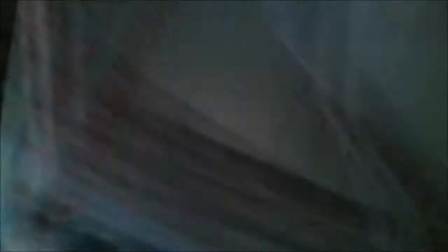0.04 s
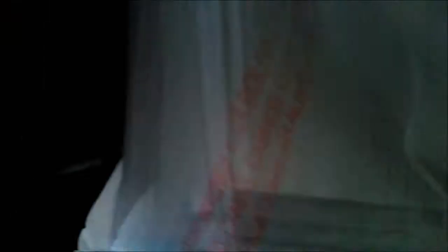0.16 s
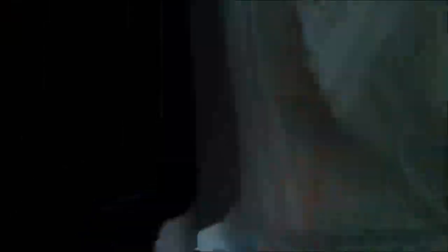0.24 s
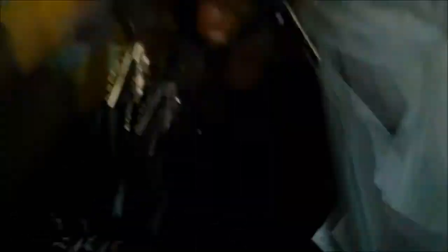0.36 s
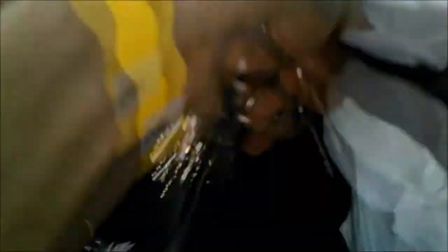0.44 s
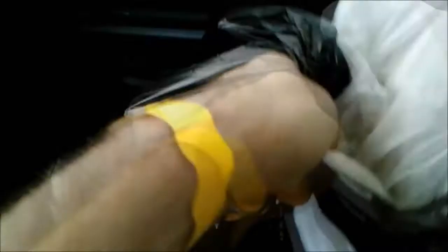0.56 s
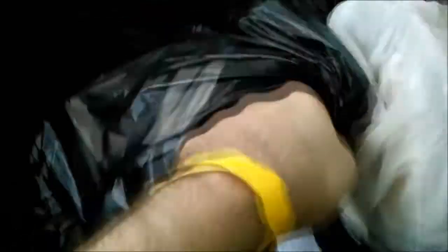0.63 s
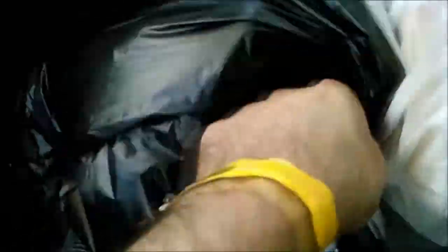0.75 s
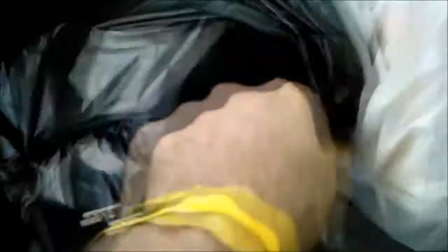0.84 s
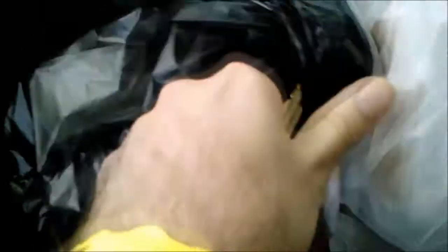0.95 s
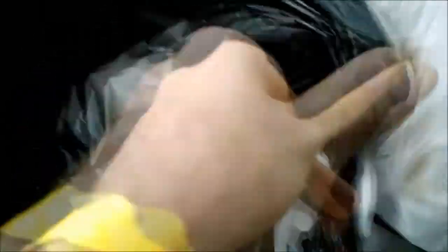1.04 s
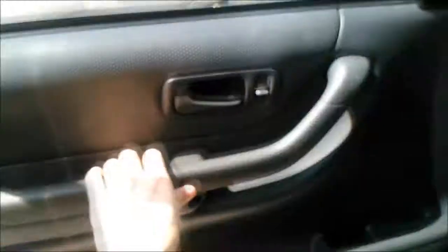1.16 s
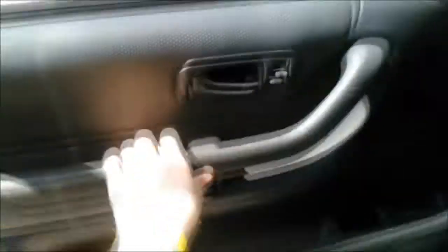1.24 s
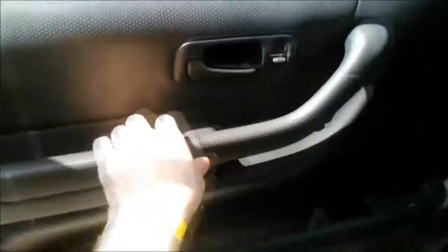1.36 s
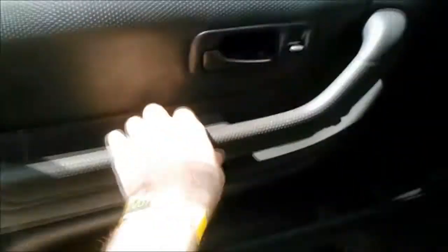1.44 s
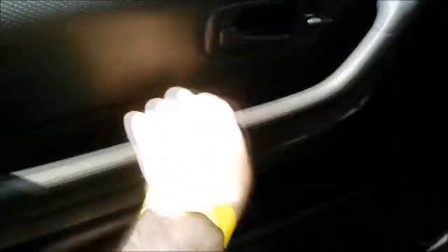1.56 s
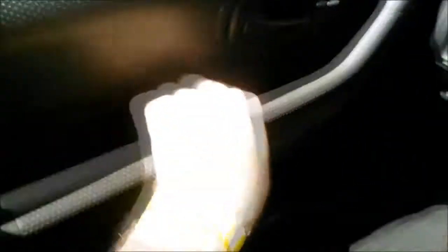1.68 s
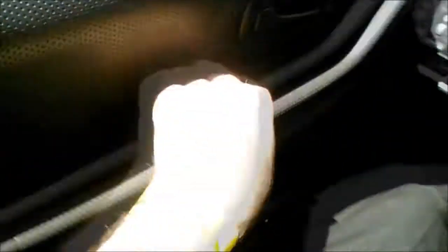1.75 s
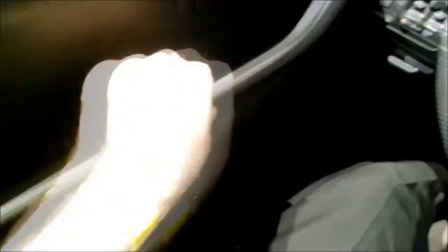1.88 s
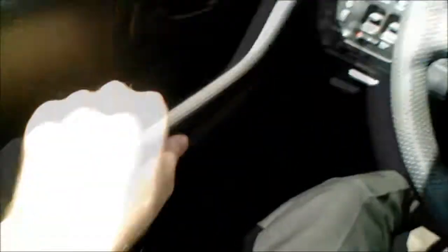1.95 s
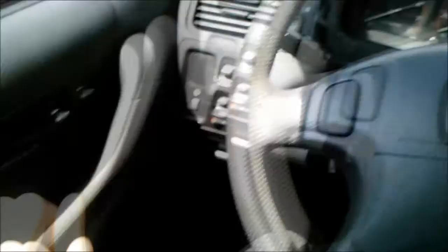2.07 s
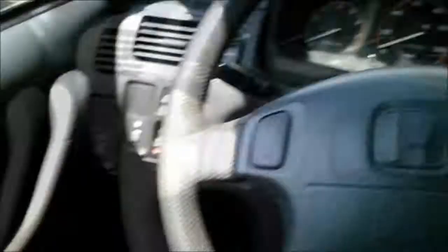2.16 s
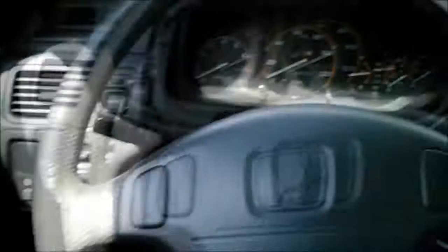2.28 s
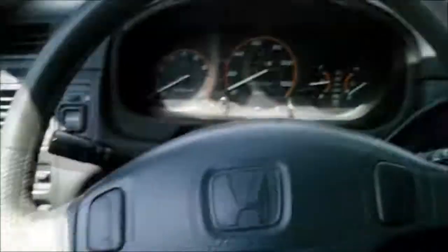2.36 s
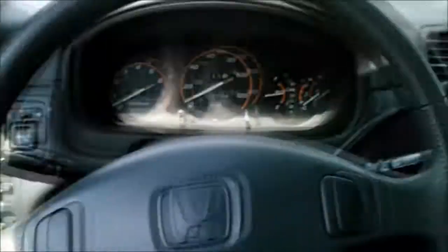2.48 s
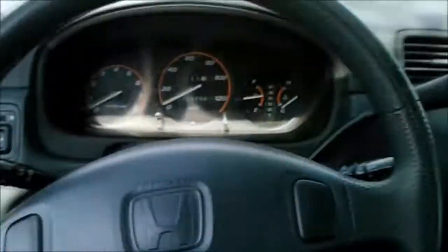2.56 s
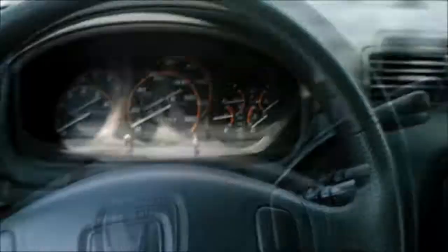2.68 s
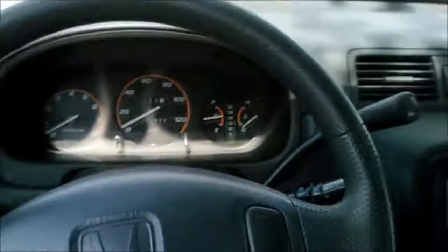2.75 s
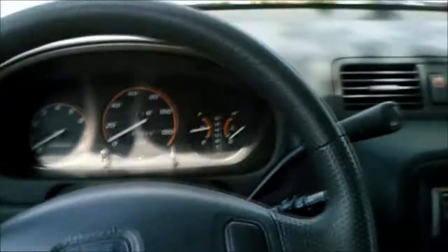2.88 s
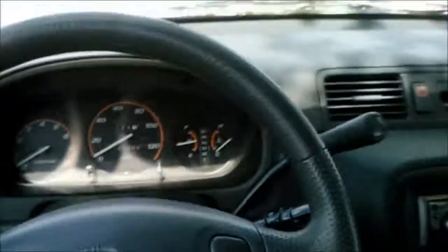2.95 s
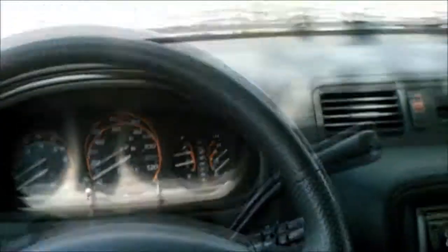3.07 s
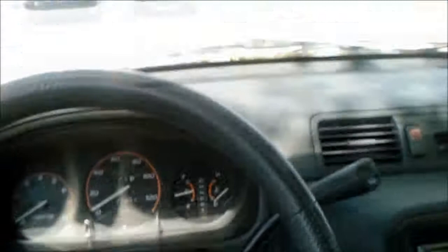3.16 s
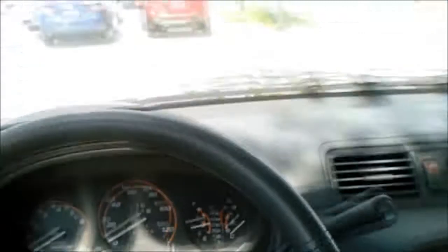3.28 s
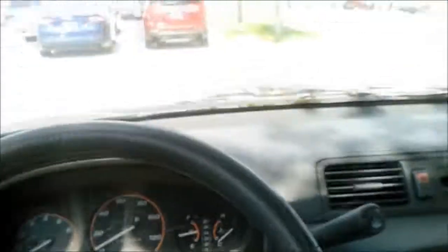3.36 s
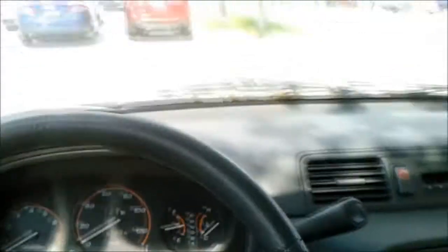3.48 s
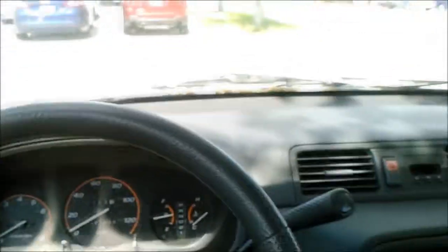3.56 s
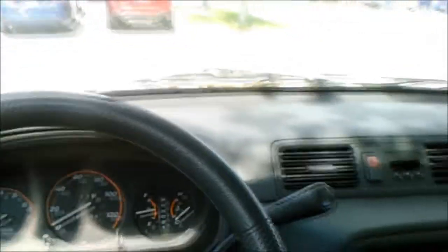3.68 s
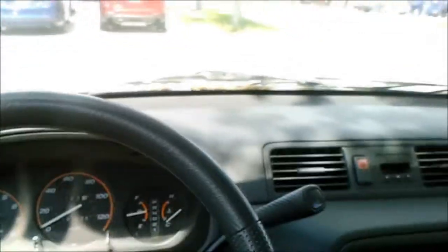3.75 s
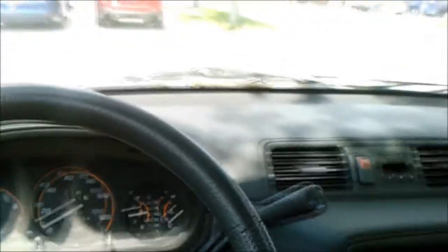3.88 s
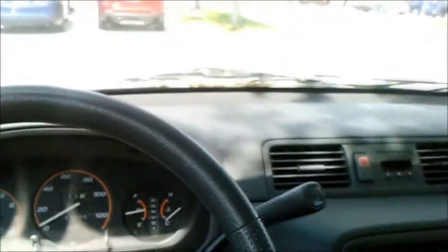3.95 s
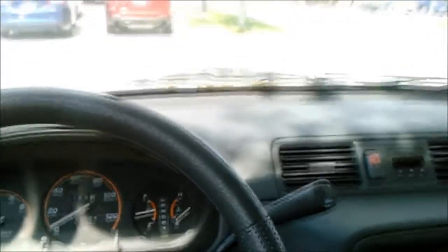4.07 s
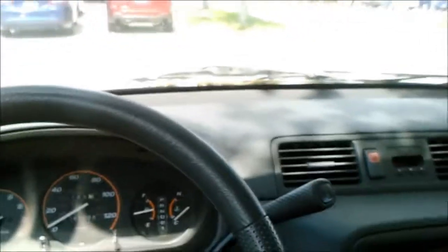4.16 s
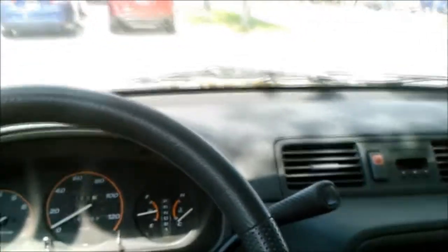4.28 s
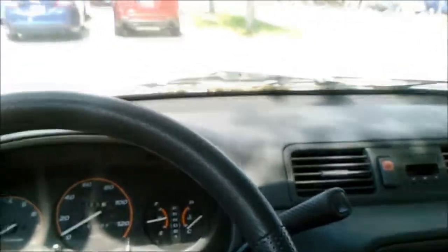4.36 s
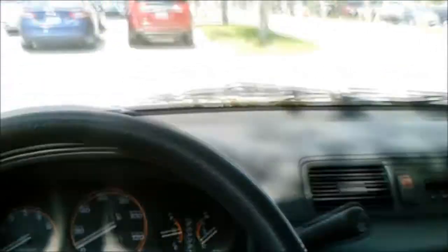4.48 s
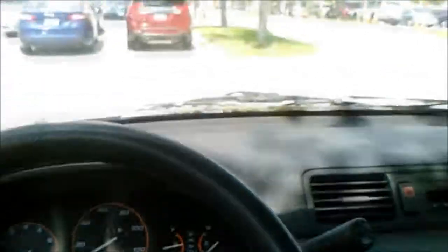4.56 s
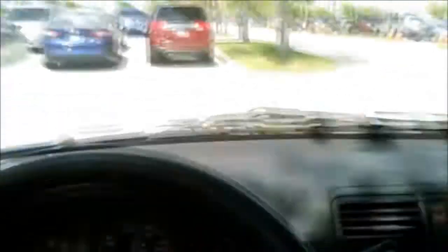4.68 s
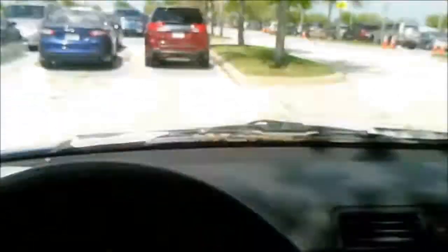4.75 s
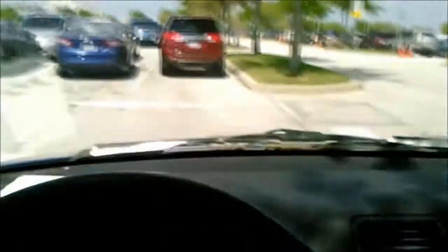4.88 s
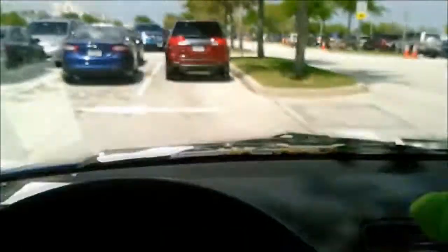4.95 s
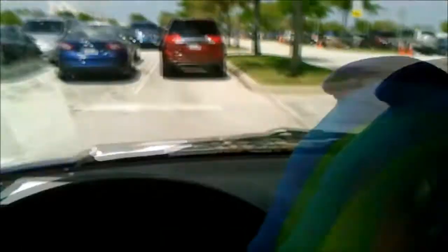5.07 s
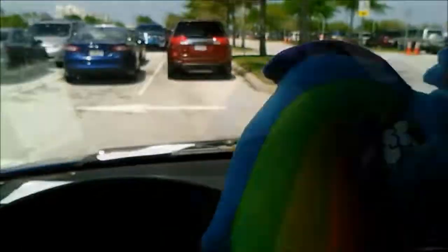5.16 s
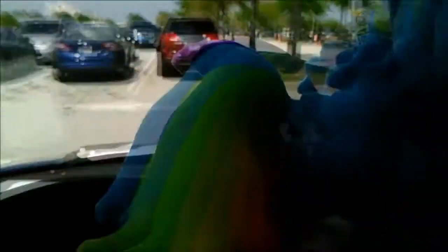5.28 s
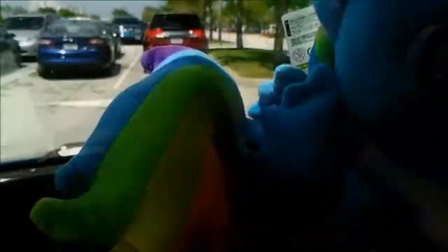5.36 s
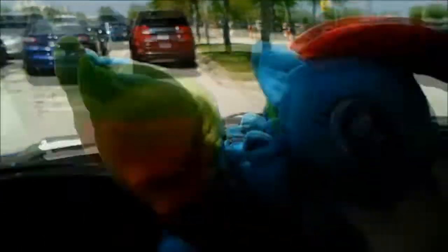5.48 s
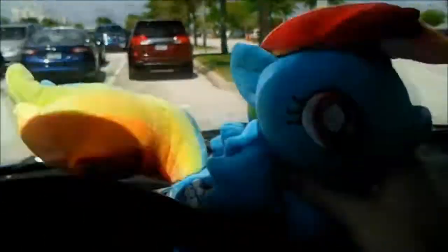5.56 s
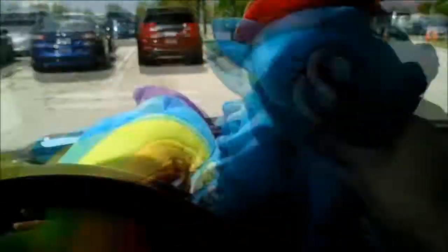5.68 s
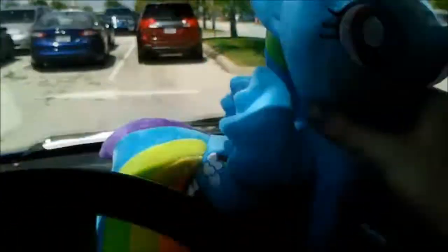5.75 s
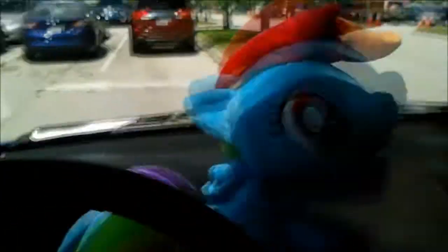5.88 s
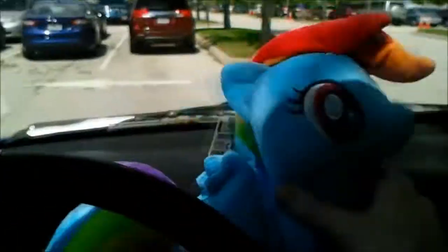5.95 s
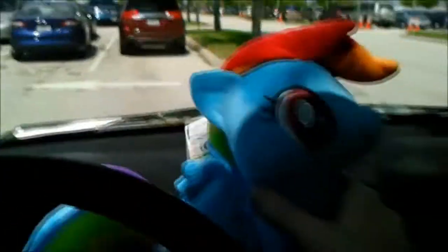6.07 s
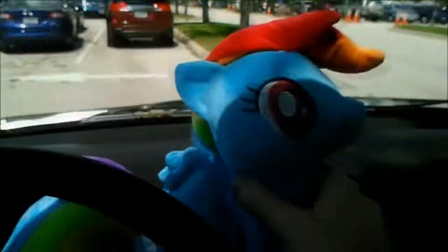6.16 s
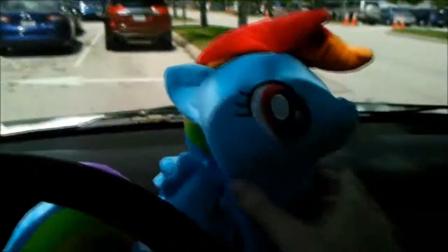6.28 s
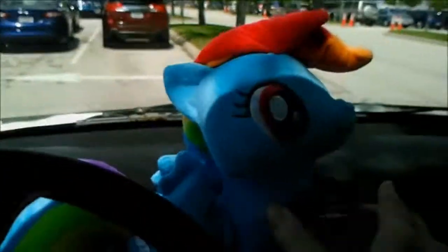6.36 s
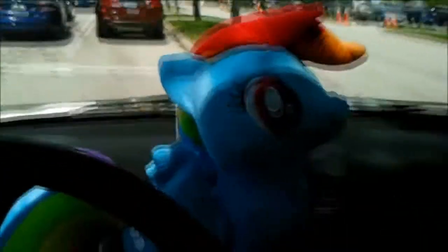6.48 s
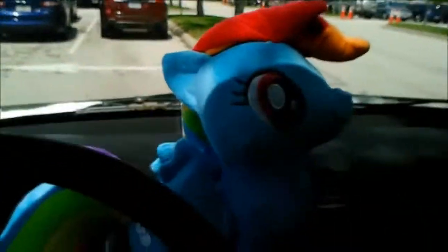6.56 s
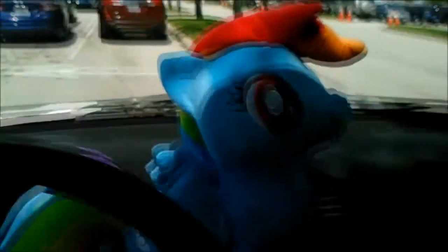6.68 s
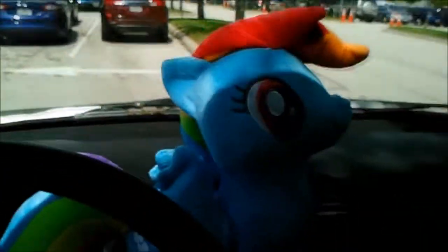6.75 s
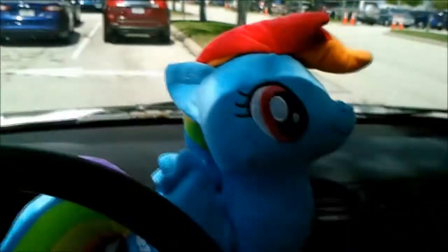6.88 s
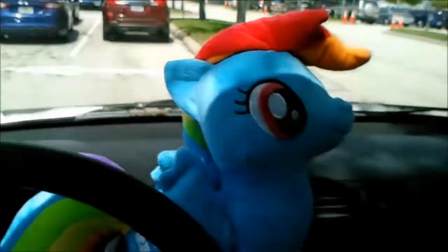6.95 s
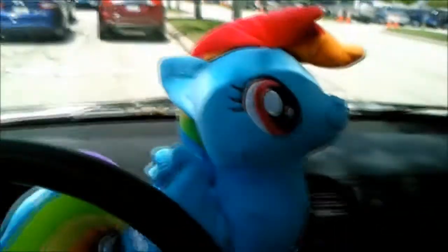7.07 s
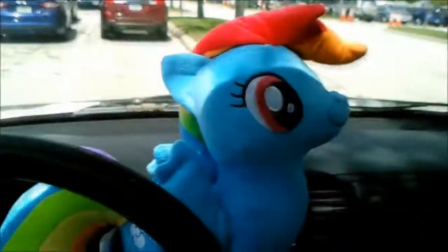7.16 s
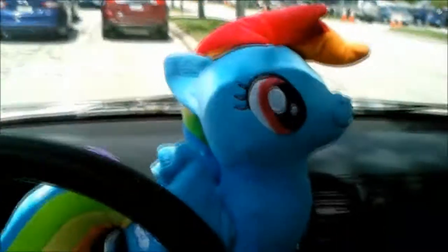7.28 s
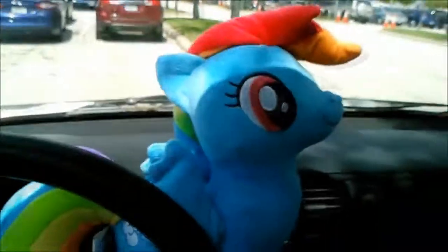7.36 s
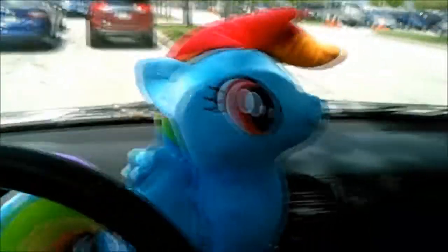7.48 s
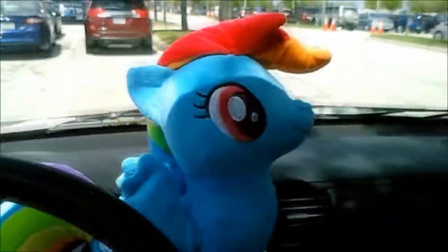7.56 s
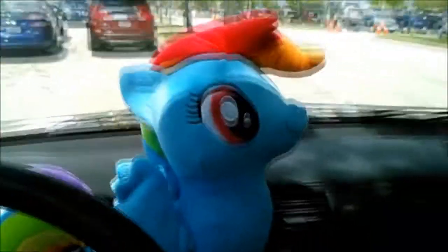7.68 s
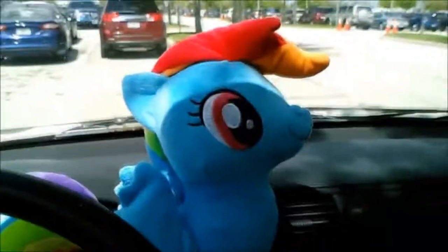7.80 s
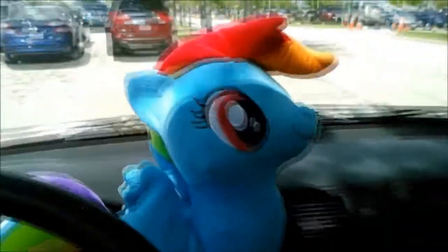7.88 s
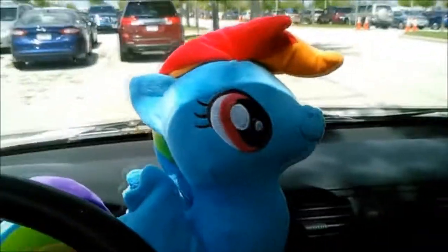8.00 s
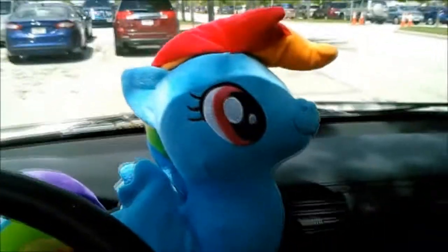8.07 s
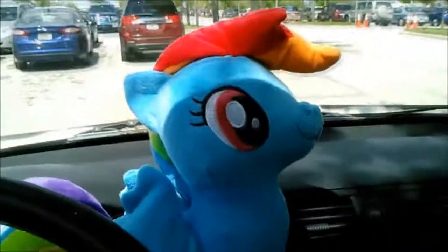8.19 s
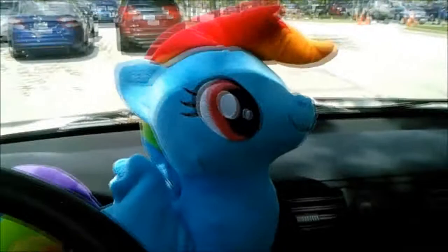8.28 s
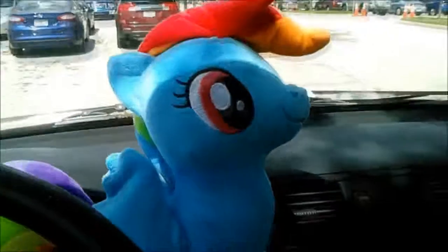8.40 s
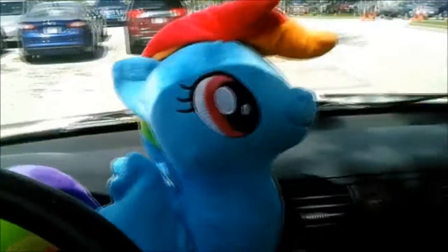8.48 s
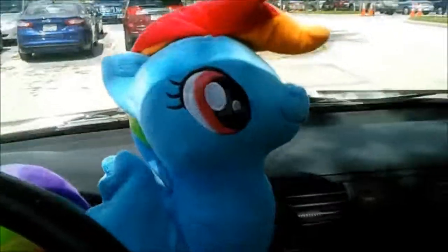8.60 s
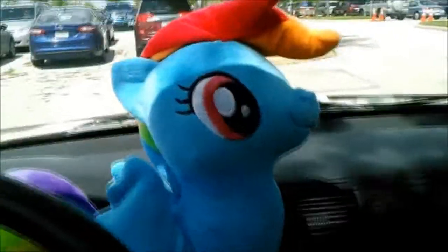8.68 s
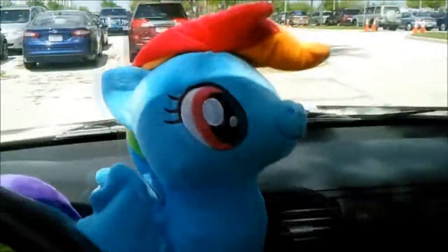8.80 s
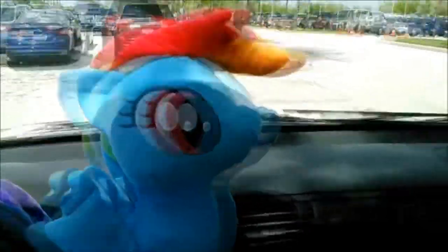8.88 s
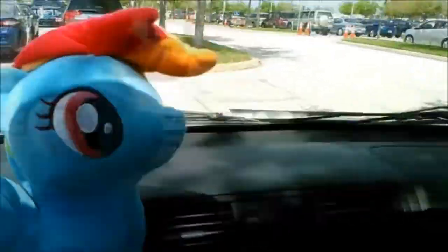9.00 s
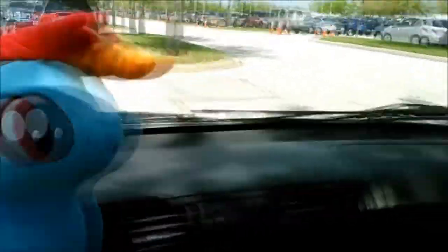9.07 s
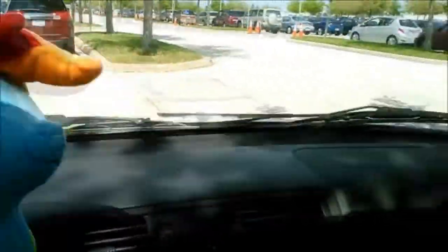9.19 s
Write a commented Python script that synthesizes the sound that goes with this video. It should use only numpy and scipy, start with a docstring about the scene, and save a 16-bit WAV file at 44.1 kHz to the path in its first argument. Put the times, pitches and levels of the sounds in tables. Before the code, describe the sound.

Close, rough mono sound: grainy plastic rustling and crumpling, a brief dull outdoor wash, then a car door latches and thuds shut, overloading the microphone. Loose trim rattles and a small reel ticks rapidly down. Afterwards the enclosed cabin is hushed, with clicks, brushing cloth, a plush toy set down with muffled knocks, and keys clinking softly.

```python
"""Inside a parked car, hand-held camera microphone, mono: low rumble and faint hum; bags and clothing rub right on it.
The door is pulled shut and overloads the microphone; a small ratchet, probably the seat-belt reel, runs down.
Then sleeves brush, trim clicks, a plush toy is set on the dashboard with soft knocks and keys jingle.
Rubs are grainy noise under stroke envelopes; door, ratchet, clicks, knocks and keys are short forces through
resonances; the background is coloured noise and wandering sines."""
import sys
import numpy as np
from scipy.fft import rfft, irfft, next_fast_len
from scipy.io import wavfile
from scipy.ndimage import map_coordinates

SR = 44100
rng = np.random.default_rng(int(sys.argv[2]) if len(sys.argv) > 2 else 0)


def store_pcm(level_fs):
    """Save levels as 16-bit WAV."""
    pcm = np.round(np.clip(level_fs, -1, 1) * 32767).astype(np.int16)
    wavfile.write(sys.argv[1], SR, np.atleast_2d(pcm).T)


N = 407043

# All table levels are relative. Spectra are densities (dB per Hz).
# Car-park rumble: f/Hz, level/dB
RUMBLE_SPECTRUM = [(18, -12.5), (35, 0.5), (54, 1), (80, -10), (130, -15.5), (160, -19.5), (270, -23),
                   (330, -29.5), (600, -28.5), (1200, -49)]
# Microphone hiss: f/Hz, level/dB
MIC_HISS_SPECTRUM = [(400, -18.5), (800, -2.5), (3000, -4.5), (6600, -2), (8500, -7.5), (15500, -5)]
# Dull wash, from outside and in swells: f/Hz, level/dB
WASH_SPECTRUM = [(50, -27), (102, 0), (135, -13.5), (220, -15), (490, -21.5), (710, -19.5), (1000, -23),
                 (1570, -23.5), (2700, -31), (6400, -32), (9000, -46.5)]
# Swells of dull wash: the opening, seat rustle and a last low scuff: t/s, hold/s, level/dB
WASH_SWELLS = [(0, .8, -45), (2.05, .1, -40), (4.4, .3, -56.5), (5.6, .6, -57), (8.6, .55, -56),
               (9.19, 0.032, -53.5)]
# Drags of the plastic over the camera: t/s, hold/s, level/dB
BAG_DRAGS = [(0, .21, -28.5), (.27, .07, -24.5), (.345, 0.13, -20.5), (.49, .05, -23), (.558, .04, -14),
             (.603, .035, -8.5), (.655, .03, -11), (.722, .025, -10), (.775, .035, -11.5), (.83, .075, -17),
             (1.02, .12, -20.5)]
# Hiss of sliding plastic: f/Hz, level/dB
BAG_HISS_SPECTRUM = [(1500, -27.5), (2900, -10.5), (3800, -2), (5000, -0.5), (6600, -0.5), (9300, -18),
                     (15500, -19.5)]
# Crunch of pressed plastic: f/Hz, level/dB
BAG_CRUNCH_SPECTRUM = [(600, -37.5), (1050, -5.5), (1500, 0.5), (2300, 0.5), (2900, -5), (4500, -26),
                       (8000, -57.5)]
# Camera body shaken by the crunch: f/Hz, level/dB
CAMERA_BODY_SPECTRUM = [(40, -24), (150, -11.5), (350, -0.5), (600, -8), (900, -2), (1400, -22),
                        (3000, -62.5)]
# The bag crumples under the hand: t/s, level/dB
BAG_CRUMPLES = [(.642, -9), (.729, -7.5), (.797, -16)]
# Dull bumps of hand and bags on the case: t/s, level/dB
CASE_BUMPS = [(0.005, -34.5), (0.383, -29.5), (0.635, -33), (0.739, -30.5), (1.123, -32.5)]
# Bumps heard through the case: f/Hz, level/dB
BUMP_SPECTRUM = [(15, -10.5), (50, 0.0), (200, -3.5), (700, -34.5)]
# Plastic clicks: t/s, level/dB, t60/s, centre f/Hz
PLASTIC_CLICKS = [(0.2276, -6, 0.049, 2760), (0.2534, -7.5, 0.017, 3140), (1.0656, -0.5, 0.0015, 5967),
                  (3.3562, -26.5, 0.01, 1780), (3.424, -39.5, .008, 1500), (3.4869, -26, 0.003, 6060),
                  (3.4995, -29.5, 0.0031, 7000), (3.539, -15, 0.0028, 5000), (3.7288, -23.5, 0.053, 1890),
                  (3.976, -47, 0.037, 1000), (4.229, -49, .02, 1510), (4.309, -45, 0.019, 1506),
                  (4.378, -31.5, 0.023, 6040), (4.602, -36.5, 0.011, 5930), (5.615, -44, 0.14, 1500),
                  (6.061, -39, 0.066, 1490), (6.082, -33.5, 0.108, 2000), (9.119, -29, .025, 5946)]
# Tone balance of the clicks: f/Hz, gain/dB
CLICK_TONE = [(100, 5.5), (300, 6.5), (800, 3), (6500, -1.5), (10000, -10.0), (16000, -11)]
# Sleeve brushing seat and camera: t/s, hold/s, level/dB
SLEEVE_BRUSHES = [(2.37, 0.18, -53), (3.13, 0.025, -51), (4.33, 0.054, -53.5), (4.425, 0.028, -48.5),
                  (4.595, .06, -49), (4.675, 0.05, -40.5), (4.785, 0.012, -43), (8.265, 0.1, -42),
                  (8.515, .02, -46), (8.635, 0.01, -48), (8.75, .19, -50.5), (8.98, 0.076, -37.5),
                  (9.09, 0.071, -46)]
# Quick scuffs: sharp onsets of bag and sleeve rubs, and short slides: t/s, level/dB
QUICK_SCUFFS = [(.559, -11), (3.538, -26), (3.552, -29), (4.788, -41), (8.349, -26)]
# Brushes and scuffs: f/Hz, level/dB
CLOTH_SPECTRUM = [(120, -29), (350, -9.5), (800, -13), (1400, -10.5), (2400, -10.5), (3200, -7), (4600, -5),
                  (6300, 0.5), (8500, -7), (15500, -19)]
# Rattle of the door trim: f/Hz, level/dB
TRIM_SPECTRUM = [(120, -24), (300, -4.5), (700, -5), (1000, -14), (1500, -9.5), (2300, -3.5), (3100, -9),
                 (4200, -4.5), (6300, -7.5), (8000, -21), (15500, -35)]
# Door panel resonances: f/Hz, width/Hz, level/dB
PANEL_MODES = [(350, 73, -7), (464, 85, -10.5), (863, 78, -4), (1286, 110, 5.5), (2060, 210, -5.5),
               (2820, 150, -5), (4080, 160, -7)]
# Door latch resonances: f/Hz, width/Hz, level/dB
LATCH_MODES = [(580, 47, 1), (698, 60, 0), (830, 87, -3.5), (346, 70, -6)]
# Modes of the cabin air and body: f/Hz, level/dB
CABIN_MODES = [(27, -5), (42, -9), (64, -2), (91, -3.5), (104, -7.5), (121, -4), (143, -6), (171, -4.5),
               (200, -10), (245, -12.5)]
# Last single rattles of the trim: t/s, level/dB
LAST_RATTLES = [(2.141, -8.5), (2.172, -14), (2.184, -12), (2.214, -24.5), (2.2635, -20), (2.326, -27),
                (2.398, -43)]
# Ratchet pawl resonances: f/Hz, width/Hz, level/dB
PAWL_MODES = [(442, 91, -3.5), (635, 80, -1), (1022, 50, 0), (1376, 130, -7), (1860, 200, -9.5),
              (3570, 560, -16.5)]
# Pawl spring resonances: f/Hz, width/Hz, level/dB
SPRING_MODES = [(1020, 68, -7.5), (1420, 150, -13.5), (1774, 64, -4.5), (2010, 100, -6), (3730, 400, -21)]
# Soft knocks on the dashboard: t/s, level/dB, ring f/Hz, t60 of the force/s
DASH_KNOCKS = [(4.66, -31, 505, 0.11), (5.842, -33.5, 416, 0.094), (6.085, -39, 94, 0.2)]
# Dashboard resonances: f/ring f, width/ring f, level/dB
DASH_MODES = [(.72, .2, 1.5), (1, 0.2, 3), (1.75, .35, -10.5), (2.3, 0.29, -8.5), (3.2, .3, -17.5),
              (4.2, 0.77, -20.5)]
# The clearest clinks of the keys: t/s, level/dB
KEY_CLINKS = [(4.958, -40), (5.1841, -27), (5.3204, -33), (5.5855, -33.5), (5.6508, -30.5), (5.876, -30.5),
              (5.9594, -33.5), (6.0302, -35.5), (6.1094, -27.5), (6.1838, -33.5), (6.2712, -30.5)]
# Key resonances: f/Hz, width/Hz, level/dB
KEY_MODES = [(4430, 197.5, -0.5), (4910, 222, -1.5), (6260, 288, 2), (6950, 350, -3.5), (8100, 900, -6),
             (10310, 2200, -21)]
# Tone balance of the keys: f/Hz, gain/dB
KEY_TONE = [(2000, 2), (3700, -0.5), (4400, -4.5), (9000, -6.5), (15000, -5.0)]

# Attacks and releases are times to rise and to fall by 60 dB.
# Background levels: door open, then settled after the slam
RUMBLE_DB, WASH_DB, HUM_DB = (-44, -49), (-50.5, -73), (-52, -64.5)
SETTLE_S = 1.5  # the background sinks this long after the slam
WASH_ATTACK_S, WASH_RELEASE_S = .7, 1.4
DRONE_S, DRONE_HOLD_S, DRONE_DB, DRONE_FADE_S = 1.42, .15, -48.5, 1.3  # a lower tone through the open door
RUB_ATTACK_S, RUB_RELEASE_S = .11, .34
RUB_END_S = 1.143  # the camera comes free
CRUNCH_DB, CRUNCH_POWER = -9.5, 0.82  # relative level; the crunch follows the hiss by a power law
CRUMPLE_HALF_S, BUMP_HALF_S = .014, .024  # from the peak to 1/e
SLEEVE_ATTACK_S, SLEEVE_RELEASE_S = .16, .3
SCUFF_RISE_S, SCUFF_FALL_S = .007, 0.0066  # by a factor of e
LATCH_S, SLAM_S = 1.922, 1.939  # the latch strikes, then the door seats
# The trim chatters after the slam: loss grows with the square of the contact number; levels relative
CHATTER_GAP_S, CHATTER_DB, CHATTER_LOSS_DB = .0238, 2, 0.33
CHATTER_T60_S, RATTLE_T60_S = .17, 0.072
PUSH_DB, PUSH_ATTACK_S, PUSH_HOLD_S, PUSH_RELEASE_S = -6.5, .04, 0.079, 0.18  # pressure wave of the door
SWAY_DB, SWAY_ATTACK_S, SWAY_RELEASE_S = -15.5, .14, 0.93  # the cabin swells with it and rings on
RATCHET_S, TEETH_PER_S = 2.377, 18.52  # the reel starts and turns evenly
TOOTH_DB, TOOTH_FADE_DB_PER_S = -30.5, 10  # relative level
JOSTLE_S, JOSTLE_END_S, JOSTLE_DB = 5.235, 6.42, -41.5  # softer key touches; relative level
TOP_HZ = 15800  # band limit of the camera


def amp(db):
    """Decibels to gain."""
    return 10 ** (np.asarray(db) / 20)


def unit(x):
    """Scale to rms 1."""
    return x / np.sqrt(np.mean(x ** 2) + 1e-20)


def clock():
    """The time of every sample in seconds."""
    return np.arange(N) / SR


def wobble(rate):
    """A smooth random curve, rate knots a second."""
    knots = rng.standard_normal(int(N * rate / SR) + 4)
    return map_coordinates(knots, [clock() * rate], mode="nearest")


def filtered(x, response):
    """x times a response of frequency, with padding for the tail."""
    m = next_fast_len(len(x) + 8192)
    return irfft(rfft(x, m) * response(np.fft.rfftfreq(m, 1 / SR)), m)[:len(x)]


def shape(points):
    """Response through (Hz, dB) points on a log frequency axis."""
    f, db = np.transpose(points)
    return lambda hz: amp(np.interp(np.log(hz + 1), np.log(f), db))


def modes(rows):
    """Causal response of (Hz, width Hz, dB) resonances with alternating signs."""
    def response(f):
        total = 0
        for k, (centre, width, db) in enumerate(rows):
            damping = 1j * f * width
            total = total + (-1) ** k * amp(db) * damping / (centre * centre - f * f + damping)
        return total
    return response


def through(x, response):
    """Filter so that white noise keeps its level."""
    return filtered(x, lambda hz: response(hz) / np.sqrt(np.mean(np.abs(response(hz)) ** 2)))


def noise(response):
    """Coloured noise of rms 1."""
    return unit(filtered(rng.standard_normal(N), response))


def friction(spectrum, grain_db, clump_db):
    """Tiny slips of unequal size (grain) whose strength also swells more slowly (clump); rms 1."""
    slips = rng.standard_normal(N) * amp(grain_db * wobble(3000) + clump_db * wobble(110))
    return unit(filtered(slips, shape(spectrum)))


def decay(t, t60):
    """An envelope that starts at t = 0 and falls 60 dB in t60 seconds."""
    return (t >= 0) * amp(-60 * np.maximum(t, 0) / t60)


def bursts(rows):
    """Chattering contacts: one dying burst of noise for each (s, dB, t60 s), powers added."""
    power, t = np.zeros(N + SR), np.arange(SR // 2) / SR
    for s, db, t60 in rows:
        power[round(s * SR):][:len(t)] += (amp(db) * decay(t, t60)) ** 2
    return np.sqrt(power[:N]) * rng.standard_normal(N)


def add(track, s, sound):
    """Mix a short sound in at time s."""
    part = track[round(s * SR):][:len(sound)]
    part += sound[:len(part)]


def tone(hz, drift_hz, rate):
    """A sine of rms 1 whose pitch wanders."""
    return np.sqrt(2) * np.sin(2 * np.pi * np.cumsum(hz + drift_hz * wobble(rate)) / SR)


def swell(start, hold, attack, release):
    """Gain that rises 60 dB in attack seconds up to start, holds at 1, then falls 60 dB in release seconds."""
    t = clock()
    distance = np.maximum((start - t) / attack, (t - start - hold) / release)
    return np.exp(-np.log(1000) * np.clip(distance, 0, 2))


def strokes(rows, attack, release):
    """Gain of (s, hold s, dB) movements; the strongest at each moment counts."""
    return np.max([amp(db) * swell(s, hold, attack, release) for s, hold, db in rows], axis=0)


def humps(rows, half):
    """Gain of short, bell-shaped (s, dB) pushes."""
    t = clock()
    return sum(amp(db) * np.exp(-((t - s) / half) ** 2) for s, db in rows)


def shut_out(open_db, shut_db):
    """Gain of a background sound that sinks away once the door is shut."""
    return amp(np.interp(clock(), [SLAM_S, SLAM_S + SETTLE_S], [open_db, shut_db]))


def background():
    """Car-park rumble, outside wash that the door shuts out, swells of dull wash, faint hums and microphone hiss."""
    rumble = shut_out(*RUMBLE_DB) * noise(shape(RUMBLE_SPECTRUM))
    swells = strokes(WASH_SWELLS, WASH_ATTACK_S, WASH_RELEASE_S)
    wash = np.hypot(shut_out(*WASH_DB), swells) * noise(shape(WASH_SPECTRUM))
    hum = shut_out(*HUM_DB) * amp(wobble(8.8)) * tone(177.2, drift_hz=0.28, rate=1.7)
    drone = amp(DRONE_DB) * swell(DRONE_S, DRONE_HOLD_S, DRONE_FADE_S, DRONE_FADE_S)
    drone *= tone(120, drift_hz=2.5, rate=12.0)
    mic_hiss = amp(-58.0) * noise(shape(MIC_HISS_SPECTRUM))
    return rumble + wash + hum + drone + mic_hiss


def bags(crackles_per_s=70):
    """Plastic drags on the case: grainy hiss with snapping creases; under pressure a crunch shakes the body."""
    hiss = strokes(BAG_DRAGS, RUB_ATTACK_S, RUB_RELEASE_S)
    crunch = amp(CRUNCH_DB) * hiss ** CRUNCH_POWER + humps(BAG_CRUMPLES, CRUMPLE_HALF_S)
    creases = (rng.random(N) < crackles_per_s / SR) * rng.standard_normal(N)
    slide = amp(0.4) * friction(BAG_HISS_SPECTRUM, grain_db=2, clump_db=1.18)
    snaps = amp(-13.0) * unit(filtered(creases, shape(BAG_HISS_SPECTRUM)))
    rub = hiss * (slide + snaps)
    # the crunch is evenly dense, its grains very unequal
    rub += amp(-3.5) * crunch * friction(BAG_CRUNCH_SPECTRUM, grain_db=3, clump_db=-0.13)
    rub += amp(-16.5) * crunch ** 0.78 * friction(CAMERA_BODY_SPECTRUM, grain_db=1.0, clump_db=2.0)
    bumps = amp(-46.5) + humps(CASE_BUMPS, BUMP_HALF_S)  # a faint steady level under the bumps
    rub += bumps * noise(shape(BUMP_SPECTRUM))
    return rub * np.clip((RUB_END_S - clock()) / .008, 0, 1)


def clicks(breadth=2.9):
    """Plastic parts snap: a short burst in one broad resonance."""
    out, t = np.zeros(N), np.arange(SR // 5) / SR
    for s, db, t60, hz in PLASTIC_CLICKS:
        force = rng.standard_normal(len(t)) * decay(t, t60)
        snap = through(force, modes([(hz, breadth * hz, 0)]))
        add(out, s, amp(db) * snap)
    return filtered(out, shape(CLICK_TONE))


def sleeve():
    """Cloth brushes in soft strokes; quick scuffs sharpen the onsets of rubs or slide by on their own."""
    t = clock()
    brushes = strokes(SLEEVE_BRUSHES, SLEEVE_ATTACK_S, SLEEVE_RELEASE_S)
    scuffs = np.zeros(N)
    for s, db in QUICK_SCUFFS:
        scuffs += amp(db) * np.exp(-np.maximum((s - t) / SCUFF_RISE_S, (t - s) / SCUFF_FALL_S))
    return (brushes + scuffs) * friction(CLOTH_SPECTRUM, grain_db=3.0, clump_db=2.0)


def door(count=8):
    """Latch strikes, cabin air booms, trim rattles; the pressure pins the microphone and chokes the rattle."""
    chatter = [(SLAM_S + k * CHATTER_GAP_S, CHATTER_DB - CHATTER_LOSS_DB * k ** 2, CHATTER_T60_S)
               for k in range(count)]
    singles = [(s, db, RATTLE_T60_S) for s, db in LAST_RATTLES]
    contacts = bursts(chatter + singles) * amp(2.6 * wobble(250))  # loose parts chatter unevenly
    rattle = amp(-2.0) * through(contacts, shape(TRIM_SPECTRUM))
    rattle += amp(-6.5) * through(contacts, modes(PANEL_MODES))
    latch = through(bursts([(LATCH_S, -8, .35)]), modes(LATCH_MODES))
    latch += through(bursts([(LATCH_S, -19, .3)]), shape(TRIM_SPECTRUM))
    pressure = amp(PUSH_DB) * swell(SLAM_S, PUSH_HOLD_S, PUSH_ATTACK_S, PUSH_RELEASE_S)
    pressure += amp(SWAY_DB) * swell(SLAM_S, PUSH_HOLD_S, SWAY_ATTACK_S, SWAY_RELEASE_S)
    boom = pressure * unit(sum(amp(db) * tone(hz, drift_hz=7, rate=25) for hz, db in CABIN_MODES))
    top = amp(-5)  # the most that the microphone can swing
    return np.clip(rattle + latch + boom, -top, top)


def ratchet(lag=0.0175, bounce=0.0034, count=15):
    """At each tooth the pawl drops and bounces once; then its spring rings and buzzes."""
    teeth = [(RATCHET_S + t, TOOTH_DB - TOOTH_FADE_DB_PER_S * t) for t in np.arange(count) / TEETH_PER_S]
    drops, flicks = np.zeros(N), np.zeros(N)
    for s, db in teeth:
        add(drops, s + .001, amp([db + 8.0]))
        add(drops, s + bounce + 0.00021 * rng.normal(), amp([db + 9.5]))
        add(flicks, s + lag + 0.00072 * rng.normal(), amp([db + 1.5]))
    scrapes = bursts([(s, db - 7, .08) for s, db in teeth])
    buzzes = bursts([(s + lag, db - 8.5, .08) for s, db in teeth])
    return through(drops + scrapes, modes(PAWL_MODES)) + through(flicks + buzzes, modes(SPRING_MODES))


def knocks():
    """Soft blows ring the damped dashboard at a pitch that depends on the spot, and skid a little."""
    out, t = np.zeros(N), np.arange(SR // 3) / SR
    for s, db, hz, t60 in DASH_KNOCKS:
        force = amp(-24.5) * rng.standard_normal(len(t)) * decay(t, t60)  # the skid
        add(force, .003, np.ones(1))  # the blow
        ring = filtered(force, modes([(hz * r, hz * w, level) for r, w, level in DASH_MODES]))
        add(out, s, amp(db + 8) * ring / np.abs(ring).max())
    return out


def keys(scatter_db=3, count=15):
    """Keys damped by the hand: every touch rings their modes at new strengths and scrapes on softly."""
    out, t = np.zeros(N), np.arange(SR // 4) / SR
    jostles = [(s + 0.034 * rng.normal(), JOSTLE_DB + 2 * rng.normal())
               for s in np.linspace(JOSTLE_S, JOSTLE_END_S, count)]
    for s, db in KEY_CLINKS + jostles:
        contact = rng.standard_normal(len(t)) * (decay(t, 0.12) + amp(-15.5) * decay(t, 0.93))
        # each touch also shifts the pitches by about one percent
        ring = modes([(hz * amp(0.091 * rng.normal()), width, level + scatter_db * rng.normal())
                      for hz, width, level in KEY_MODES])
        add(out, s, amp(db - 4.5) * through(contact, ring))
    return filtered(out, shape(KEY_TONE))


def scene():
    """Everything reaches one microphone, fed to two equal channels."""
    mono = background() + bags() + clicks() + sleeve() + door() + ratchet() + knocks() + keys()
    return np.array([mono, mono])


def record(dry):
    """The camera clips at full scale and keeps nothing above its band limit."""
    return np.array([filtered(np.clip(side, -1, 1), lambda hz: hz < TOP_HZ) for side in dry])


dry = scene()
out = record(dry)
store_pcm(out)
```